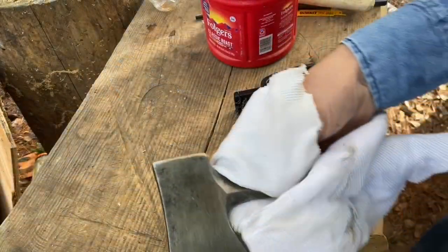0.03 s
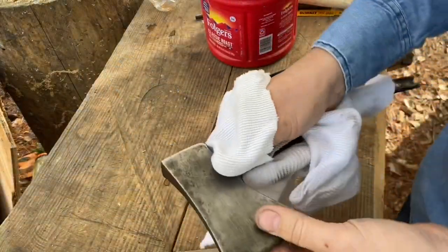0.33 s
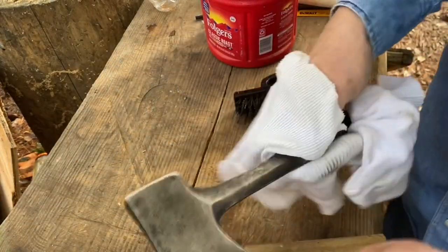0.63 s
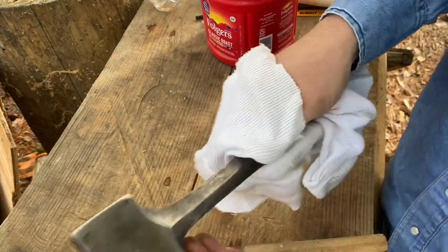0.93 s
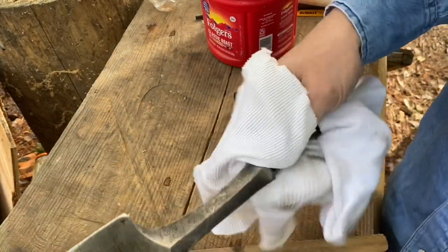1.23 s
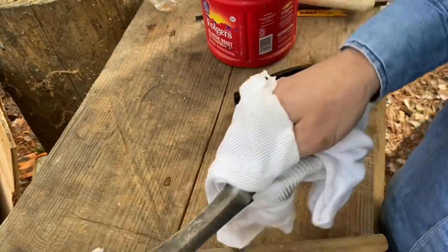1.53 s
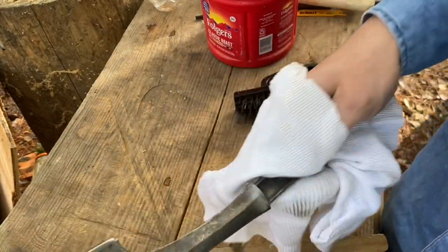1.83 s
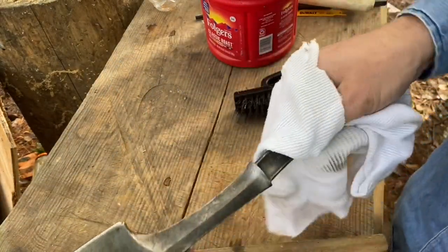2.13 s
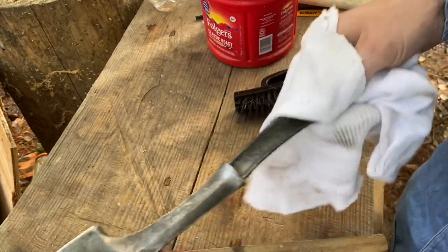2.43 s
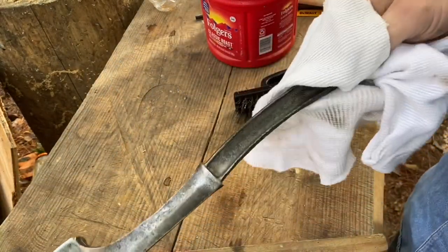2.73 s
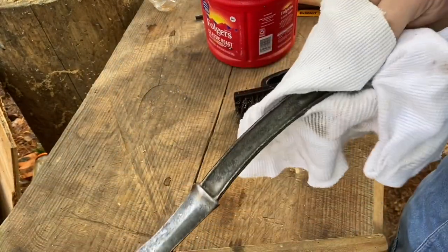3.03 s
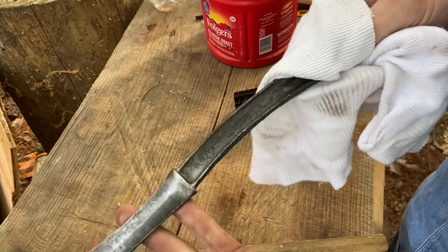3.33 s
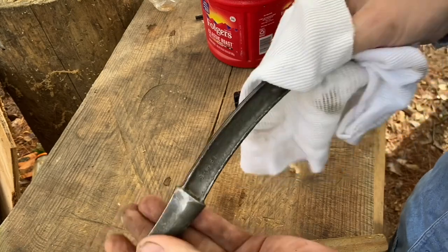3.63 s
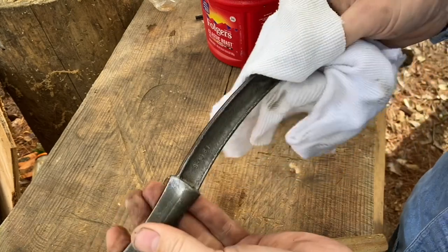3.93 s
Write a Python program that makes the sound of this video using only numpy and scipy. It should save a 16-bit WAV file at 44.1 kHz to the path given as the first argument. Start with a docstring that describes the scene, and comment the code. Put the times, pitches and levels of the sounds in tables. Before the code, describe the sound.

A cloth wipes a steel hatchet in short, rasping strokes, with dull handling knocks.

```python
"""A cotton cloth wipes a steel hatchet in short strokes, close up, over a wooden bench.
First the ribbed knit rasps, fibres catch and slip on the steel and faintly ring it, and the tool
knocks dully in the hands. After a lull the wipes crowd together from 1.4 to 2.7 s, then turn soft.
Just past 3 s the tool knocks again and a palm shifts on the handle.
A low steady rumble and faint birds outside run throughout."""
import sys
import numpy as np
from scipy import signal
from scipy.fft import rfft, irfft
from scipy.io import wavfile
from scipy.ndimage import map_coordinates

SR = 44100
rng = np.random.default_rng(int(sys.argv[2]) if len(sys.argv) > 2 else 0)


def generate_wav(signal):
    """Clip the signal to [-1, 1] and save it as 16-bit WAV at the path in sys.argv[1]."""
    frames = np.transpose(np.atleast_2d(signal))
    scaled = np.clip(frames, -1, 1) * 32767
    pcm = np.round(scaled).astype(np.int16)
    wavfile.write(sys.argv[1], SR, pcm)


N = 176400
FREQ = np.maximum(np.fft.rfftfreq(N, 1 / SR), 1)
# Stereo width of the cloth. Each row: frequency in Hz, side over mid in dB.
CLOTH_WIDTH = [(500, -2), (1500, -7), (5000, -5.5), (9000, -20)]


def wipes(t):
    """Each wipe swells, holds and lets go; the ribs of the knit make it rasp and the steel rings along."""
    # Each row: start, rise, hold and fall in seconds, relative level in dB, body and air offsets in dB.
    strokes = [ (-.02, 0.028, 0.033, 0.1, -63, -1, 13), (0.06, 0.047, 0.07, 0.19, -64, 7.5, 4.5),
               (0.273, 0.041, 0.07, 0.05, -61.5, 6.5, 11), (0.354, 0.083, 0.088, 0.073, -54.5, -1.5, 6.5),
               (0.468, 0.049, 0.033, 0.039, -51.5, 0.5, 1), (0.839, 0.025, 0.013, 0.027, -56, 7, 7.5),
               (0.899, 0.0087, 0.041, 0.017, -73, 7.5, -1), (1.06, 0.064, 0.0062, 0.1, -57.5, -8, 1.5),
               (1.287, 0.01, 0.033, 0.12, -67.5, -3, 4), (1.433, 0.027, .004, 0.031, -58, 7.5, -0.5),
               (1.479, 0.027, 0.0081, 0.015, -55, 3, -10), (1.61, 0.023, 0.043, 0.026, -61.5, -6, 3.5),
               (1.641, 0.015, 0.009, 0.015, -51.5, -4.5, -16), (1.68, 0.024, 0.063, 0.09, -50, -5.5, -6.5),
               (1.901, 0.029, 0.023, 0.051, -55, -4, 2), (1.965, 0.052, 0.0075, 0.011, -52, -6.5, -10),
               (2.029, 0.0082, 0.0072, 0.035, -61.5, -9, -3), (2.101, 0.009, 0.019, 0.023, -60.5, 1, -10),
               (2.171, 0.039, 0.009, 0.028, -62.5, -0.5, -1), (2.225, 0.049, 0.035, 0.13, -52.5, 1.5, -6.5),
               (2.304, 0.063, 0.04, 0.048, -52, 1.5, -4), (2.495, 0.1, 0.018, 0.058, -58.5, 1.5, -11),
               (2.729, 0.017, 0.02, 0.056, -72.5, 3.5, 2.5), (2.813, 0.021, .01, 0.24, -75.5, -8, 1),
               (3.149, 0.0063, 0.039, 0.1, -70, 5.5, 4), (3.278, .005, 0.035, .035, -69.5, 5, 2),
               (3.322, 0.065, .006, 0.017, -70.5, -3, 15.5), (3.4, 0.0036, .008, 0.22, -73, -10, 3),
               (3.52, 0.0051, 0.034, 0.036, -59, -3, -6.5), (3.727, 0.055, 0.29, 0.12, -77.5, -12, 3.5),
               (3.86, 0.008, 0.014, 0.038, -66, -4.5, 2)]
    # Cloth on steel. Each row: frequency in Hz, spectral density in dB.
    rub_spectrum = [(150, -14), (400, -1.5), (900, -2), (2100, 0.76), (3700, 2), (5200, -3), (7400, -1.24),
                    (8700, -6), (11500, -9), (13800, -10.5), (16000, -14.5)]
    rib_hz, rib_drift, rib_db = 88, .25, .7
    judder_hz, judder_db = 126, .9
    power = np.zeros((3, N))  # body, centre and air bands
    for start, rise, hold, fall, db, body_db, air_db in strokes:
        attack, release = (t - start) / rise, 1 - (t - start - rise - hold) / fall
        envelope = np.clip(np.minimum(attack, release), 0, 1)
        power += (undb([db + body_db, db, db + air_db])[:, None] * envelope) ** 2
    corners_hz = [1200, 5000, 7500, 11000]
    band_gains = [0.81, 0.017, 0, 0.17], [0.012, 0.95, 0.89, 0.15], [0, 0, 0.15, 0.82]
    bands = [np.interp(np.log(FREQ), np.log(corners_hz), gains) for gains in band_gains]
    ribs = np.sin(2 * np.pi * np.cumsum(rib_hz * (1 + rib_drift * walk(9.47))) / SR)
    drive = np.sqrt(power) * undb(rib_db * ribs + judder_db * walk(judder_hz))
    spectra = [(rfft(drive * fibres()) * bands).sum(axis=0) for _ in range(2)]
    rubs = [irfft(spectrum * colour(rub_spectrum), N) for spectrum in spectra]
    mid, side = (rub + steel_ring(rub, t) for rub in rubs)
    return undb(7) * stereo(mid, filtered(side, CLOTH_WIDTH))


def fibres():
    """Countless slipping fibres with sharper snags among them."""
    snags_per_s, scatter_db, snag_db = 4000, 1, -4
    snags = (rng.random(N) < snags_per_s / SR) * rng.standard_normal(N)
    snags *= undb(scatter_db * np.minimum(rng.exponential(size=N), 4))
    return unit(rng.standard_normal(N) + undb(snag_db) * unit(snags))


def steel_ring(rub, t):
    """The rub excites the modes of the hand-damped steel."""
    # Each row: frequency in Hz, relative lift in dB.
    modes = [(2810, 3), (3381, 7.5), (4390, 3), (4667, 0.5), (4900, 10.5), (5380, 6), (6250, 8),
             (6500, 10.5), (6884, 2), (7666, 5), (8604, 1), (10659, 10)]
    # The ring grows, then is damped as the cloth reaches the handle. Each row: time in s, gain in dB.
    freedom = [(0, -3), (2.2, 2), (2.8, -2)]
    half_width_hz = 24
    response = sum(undb(db - 1) / (1 + 2j * (FREQ - hz) / half_width_hz) for hz, db in modes)
    return irfft(rfft(rub * undb(contour(freedom, t))) * response, N)


def drag(t):
    """Bunched folds keep rustling softly between wipes."""
    # Each row: time in seconds, level in dB.
    levels = [(0, -65), (.7, -67.5), (1.05, -70), (1.6, -70), (2.7, -72), (3, -78), (3.7, -78.5), (4, -74)]
    # Each row: frequency in Hz, spectral density in dB.
    fold_spectrum = [(300, -1), (700, 8), (1200, -3), (2200, 7), (3700, 3), (5000, -9), (8000, -6),
                     (11000, -11.5), (16000, -36)]
    mid, side = (unit(filtered(fibres(), fold_spectrum)) for _ in range(2))
    return stereo(mid, filtered(side, CLOTH_WIDTH)) * undb(contour(levels, t) - 0.5 * walk(34))


def sliding_contact(rub):
    """As the contact slides along the steel, narrow bands of the rub come and go."""
    depth_db, patch_hz, patch_s = 2.1, 400, .025
    f, t, spectrogram = signal.stft(rub, SR, nperseg=512)
    patches = rng.standard_normal((int(f[-1] / patch_hz) + 2, int(t[-1] / patch_s) + 2))
    grid = np.meshgrid(f / patch_hz, t / patch_s, indexing="ij")
    gain_db = depth_db * map_coordinates(patches, grid, mode="mirror")
    return signal.istft(spectrogram * undb(gain_db), SR)[1][..., :N]


def ticks():
    """A thread or fingertip catches with a dry snap; narrower bands ring longer."""
    # Each row: start in seconds, level in dB, centre in Hz, width in octaves.
    catches = [(0.808, -63, 12000, .47), (0.821, -51, 5500, 1.1), (.944, -66, 9000, 0.64),
               (1.46, -52, 2000, .6), (2.454, -70, 9000, 0.88), (3.073, -65.5, 3720, 0.27),
               (3.116, -59.5, 2050, 0.12), (3.244, -56.5, 1520, .12), (3.243, -60, 3000, .2),
               (3.402, -56.5, 4500, 0.88), (3.522, -58, 5200, 0.74)]
    one_octave_t60_s, side_db = 0.016, -8
    out, size = np.zeros((2, N + SR)), SR // 10
    f, age = np.maximum(np.fft.rfftfreq(size, 1 / SR), 1), np.arange(size) / SR
    for start, db, hz, octaves in catches:
        band = np.exp(-(np.log2(f / hz) / octaves) ** 2)
        mid, side = unit(irfft(rfft(rng.standard_normal((2, size))) * band, size))
        envelope = undb(db) * decay(age, one_octave_t60_s / np.sqrt(octaves))
        i = int(start * SR)
        out[:, i:i + size] += envelope * stereo(mid, undb(side_db) * side)
    return out[:, :N]


def handling():
    """The hatchet shifts in the grip: a low thud, and a hollow knock that differs in each ear."""
    # Each row: start in seconds, thud gain in dB, thud pitch in Hz, knock gain in dB, pan in dB.
    blows = [(0.207, -56, 110, -51.5, -4), (0.336, -48, 98, -55.5, -5), (.361, -30.5, 116, -58, 1),
             (0.379, -28.5, 104.4, -65, 3), (0.412, -32, 100.4, -64, 2), (0.442, -33, 89, -80, 2),
             (0.563, -36, 83, -69, 2), (1.414, -48, 106, -53, -9), (2.006, -33, 93.3, -62, -2),
             (3.12, -29, 127.5, -50.5, -8.5), (3.717, -35.5, 77, -72, 2.5), (3.958, -44, 154, -52.5, -9.5)]
    # Each row: multiple of the thud pitch, T60 in seconds, relative level in dB.
    thud_partials = [(.8, 0.086, -1), (1, 0.093, 0.5), (1.4, 0.1, -6)]
    # Each row: frequency in Hz, T60 in seconds, relative level in dB.
    knock_modes = [(369, 0.052, 7.5), (415, 0.033, -2), (617, 0.084, -8), (806, 0.12, -4)]
    out, age = np.zeros((2, N + SR)), np.arange(SR // 5) / SR
    for start, thud_db, thud_hz, knock_db, pan_db in blows:
        thud_modes = [(ratio * thud_hz, t60_s, db) for ratio, t60_s, db in thud_partials]
        thud = -undb(thud_db) * impact(thud_modes, age, contact_s=0.0074)
        knock = undb(knock_db) * np.array([impact(knock_modes, age, contact_s=0.0011) for _ in range(2)])
        i = int(start * SR)
        out[:, i:i + len(age)] += pan(thud + knock, pan_db)
    return out[:, :N]


def impact(modes, age, contact_s):
    """Damped modes after a soft contact, detuned at random on every blow."""
    ring = np.zeros(len(age))
    for hz, t60_s, db in modes:
        detuned_hz = hz * (1 + 0.062 * rng.standard_normal())
        ring += undb(db) * np.sin(2 * np.pi * detuned_hz * age) * decay(age, t60_s)
    return ring * (1 - np.exp(-age / contact_s))


def palm(t):
    """Skin creeps over the handle with a low, uneven rub, off to the right."""
    # Each row: time in seconds, level in dB.
    levels = [(.25, -63), (.7, -73), (2.7, -77.5), (3.22, -59.5), (3.55, -76)]
    # Each row: frequency in Hz, spectral density in dB.
    skin_spectrum = [(60, -24), (180, 2.5), (400, -2.5), (750, -13.5), (4000, -60)]
    rub = np.array([noise(colour(skin_spectrum)) for _ in range(2)])
    return pan(rub * undb(contour(levels, t) + 2 * walk(30)), pan_db=-7.5)


def birds(t):
    """Far raspy glides, a repeated rising note and whistles, smeared by outdoor echoes."""
    # Each row: start and length in seconds, first and last pitch in Hz, level in dB, rasp cutoff in Hz.
    notes = [(0.058, 0.15, 3550, 3560, -66.5, 250), (0.559, 0.28, 3570, 3495, -69.5, 200),
             (0.622, 0.18, 2330, 2335, -71.5, 120), (0.907, 0.037, 2450, 2590, -68, 150),
             (1.021, 0.13, 2850, 3340, -70, 80), (1.059, 0.039, 2100, 2560, -73, 90),
             (1.209, 0.071, 2600, 2390, -72, 170), (1.549, 0.0313, 3700, 3170, -67.5, 90),
             (1.598, 0.053, 2150, 2810, -72, 70), (1.817, 0.028, 2400, 2370, -64.5, 160),
             (2.18, 0.063, 1996, 2420, -69, 60), (2.664, 0.13, 2950, 3060, -74.5, 497)]
    trill_start_s, trill_period_s = 2.178, .152
    trill = [(trill_start_s + k * trill_period_s, .04, 1880, 2307, -78, 45) for k in range(11)]
    song = whistles(t)
    for start, length, first_hz, last_hz, db, rasp_hz in notes + trill:
        on = (t >= start) & (t < start + length)
        progress = (t[on] - start) / length
        white = rng.standard_normal((2, SR // 2))[:, :len(progress)]
        rasp = signal.sosfilt(signal.butter(2, rasp_hz, fs=SR, output="sos"), white[0] + 1j * white[1])
        phase = 2 * np.pi * np.cumsum(first_hz + (last_hz - first_hz) * progress) / SR
        envelope = np.sqrt(np.sin(np.pi * progress))
        song[on] += undb(db) * unit(envelope * np.real(rasp * np.exp(1j * phase)))
    return song + undb(-4) * echoes(song, t60_s=.4)


def whistles(t):
    """Clean, slightly wavering bird tones."""
    # Each row: start and length in seconds, first and last pitch in Hz, level in dB.
    tones = [(3.198, .06, 3830, 3760, -71), (3.76, 0.266, 2380, 2470, -80)]
    song, waver = np.zeros(N), 1 + .006 * walk(25)
    for start, length, first_hz, last_hz, db in tones:
        progress = np.clip((t - start) / length, 0, 1)
        phase = 2 * np.pi * np.cumsum((first_hz + (last_hz - first_hz) * progress) * waver) / SR
        song += undb(db) * np.sqrt(2 * np.abs(np.sin(np.pi * progress))) * np.sin(phase)
    return song


def background():
    """A low rumble, alike in both ears, under a thin wavering outdoor hiss."""
    # Each row of both: frequency in Hz, spectral density in dB.
    rumble_spectrum = [(20, -31), (32, -18), (48, -0.5), (62, 2.5), (80, -4.5), (110, -6), (160, -10),
                       (230, -19.5), (340, -19.5), (500, -33.5), (1500, -63)]
    hiss_spectrum = [(500, 11), (2300, -5), (3600, 2.5), (5000, -4), (12000, -20), (16000, -28)]
    # Each row: frequency in Hz, side over mid in dB.
    rumble_width = [(30, -19.5), (80, -16.5), (160, -13), (300, -6), (600, 0)]
    mid, side = (noise(colour(rumble_spectrum)) for _ in range(2))
    rumble = stereo(mid, filtered(side, rumble_width))
    mid, side = (noise(colour(hiss_spectrum)) for _ in range(2))
    hiss = stereo(mid, undb(5.5) * side) * undb(1.5 * walk(1.8))
    return undb(-50.5) * rumble + undb(-84) * hiss


def echoes(x, t60_s):
    """A diffuse tail, different in each ear."""
    tails = rng.standard_normal((2, SR)) * decay(np.arange(SR) / SR, t60_s)
    return np.array([signal.fftconvolve(x, tail / np.linalg.norm(tail))[:N] for tail in tails])


def undb(db):
    """Decibels to gain."""
    return 10 ** (np.asarray(db) / 20)


def unit(x):
    """Scale to rms 1."""
    return x / np.sqrt(np.mean(x ** 2))


def decay(age, t60_s):
    """Envelope falling 60 dB in t60_s."""
    return np.exp(-np.log(1000) * age / t60_s)


def contour(points, t):
    """Level in dB over time from (s, dB) points."""
    return np.interp(t, *np.array(points).T)


def colour(points):
    """Gain at each frequency from (Hz, dB) points."""
    hz, db = np.array(points).T
    return undb(np.interp(np.log(FREQ), np.log(hz), db))


def filtered(x, points):
    """Equalise by (Hz, dB) points."""
    return irfft(rfft(x) * colour(points), N)


def noise(gain):
    """Noise of rms 1 with the given spectrum."""
    return unit(irfft(rfft(rng.standard_normal(N)) * gain, N))


def walk(hz):
    """Smooth random drift of rms 1, rolling off at hz."""
    return noise(np.exp(-(FREQ / hz) ** 2))


def stereo(mid, side):
    """Left and right from mid and side."""
    return np.array([mid + side, mid - side])


def pan(x, pan_db):
    """Set left over right by pan_db."""
    return x * undb([[pan_db / 2], [-pan_db / 2]])


def scene():
    """Cloth and hatchet in front with a short echo off the bench; birds and rumble behind."""
    t = np.arange(N) / SR
    cloth = pan(sliding_contact(wipes(t) + drag(t)) + ticks(), pan_db=0.86)
    near = cloth + handling() + palm(t)
    bench = undb(-17) * echoes(near.mean(axis=0), t60_s=0.15)
    return near + bench + birds(t) + background()


def record(dry):
    """The right microphone lags in the high treble; the top is cut."""
    lag_from_hz, full_turn_hz, cutoff_hz = 6950, 4280, 15800
    spectrum = rfft(dry)
    spectrum[1] *= np.exp(-2j * np.pi * np.maximum(FREQ - lag_from_hz, 0) / full_turn_hz)
    lowpass = signal.ellip(10, .2, 70, cutoff_hz, fs=SR, output="sos")
    return signal.sosfilt(lowpass, irfft(spectrum, N))


dry = scene()
out = record(dry)
generate_wav(out)
```